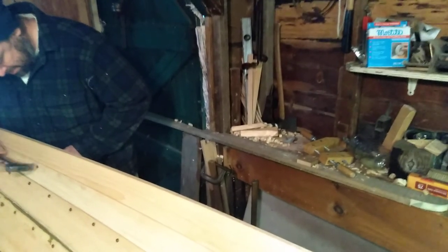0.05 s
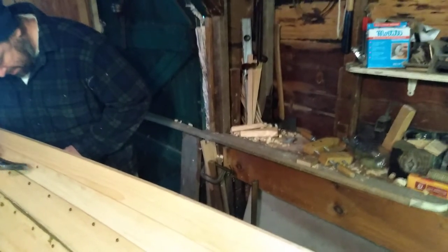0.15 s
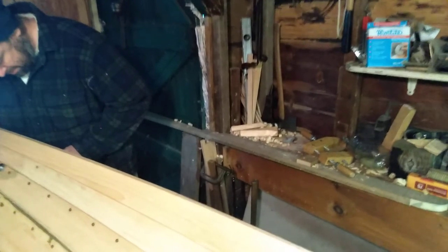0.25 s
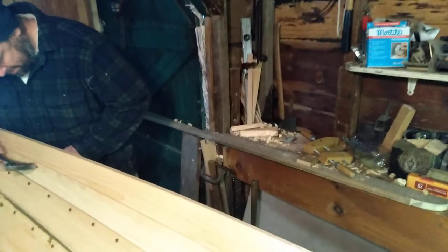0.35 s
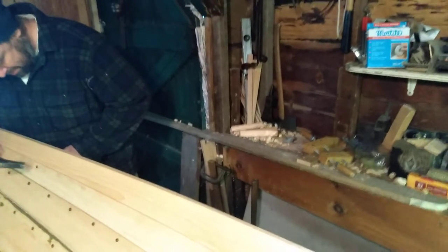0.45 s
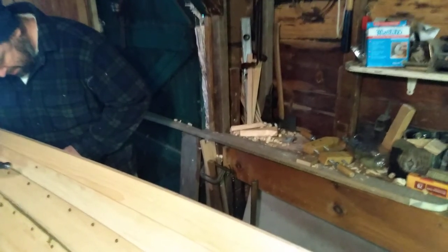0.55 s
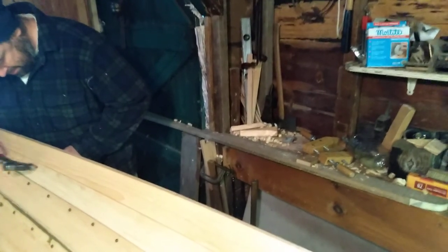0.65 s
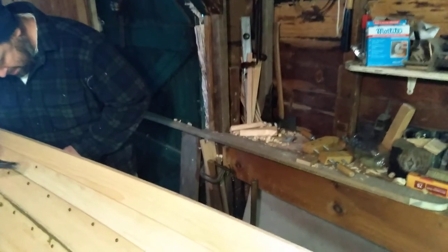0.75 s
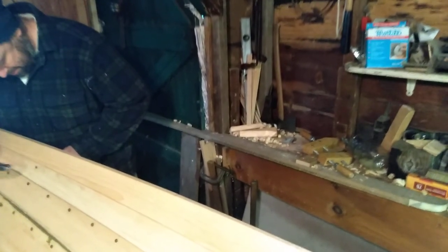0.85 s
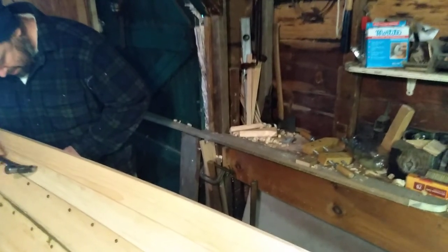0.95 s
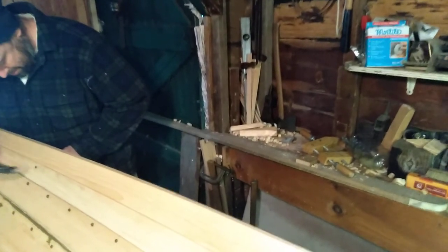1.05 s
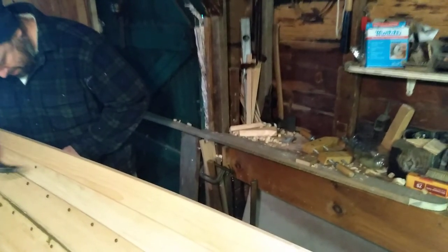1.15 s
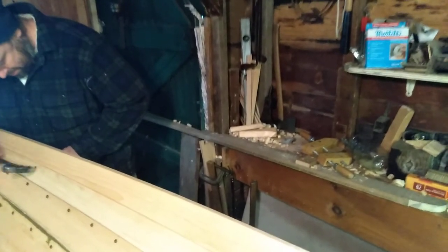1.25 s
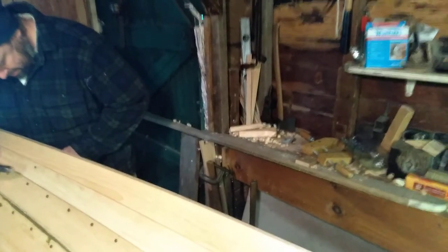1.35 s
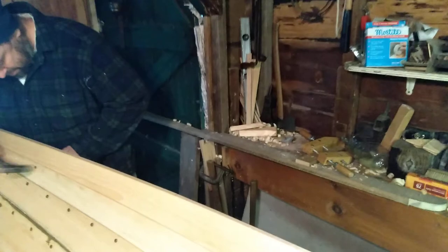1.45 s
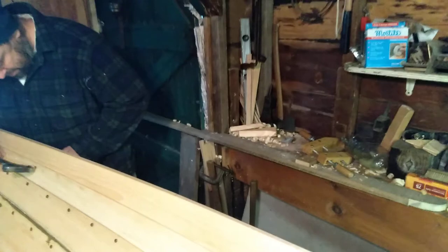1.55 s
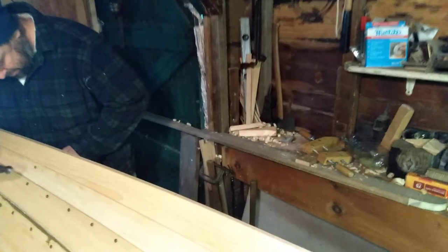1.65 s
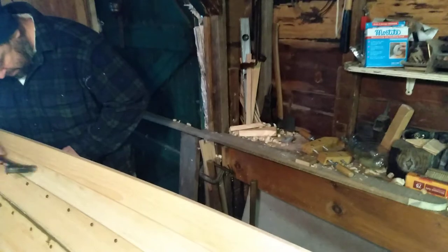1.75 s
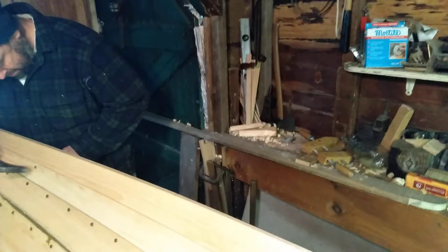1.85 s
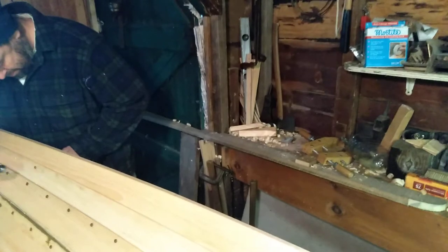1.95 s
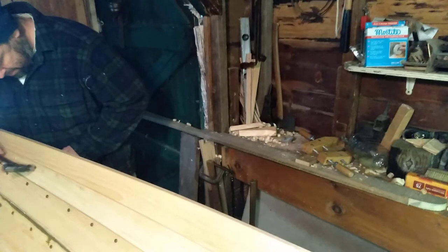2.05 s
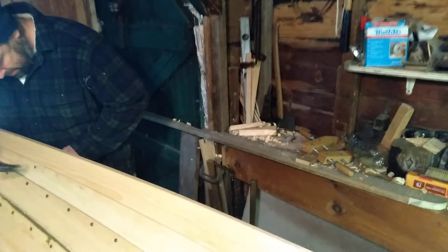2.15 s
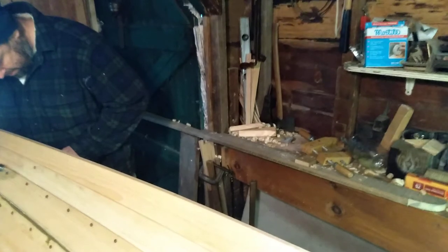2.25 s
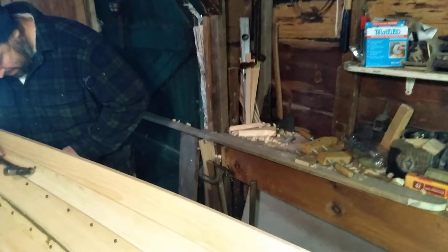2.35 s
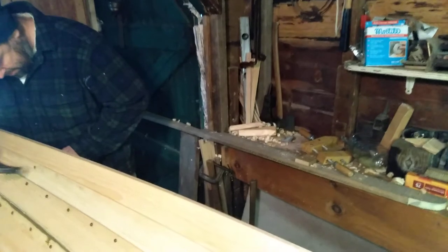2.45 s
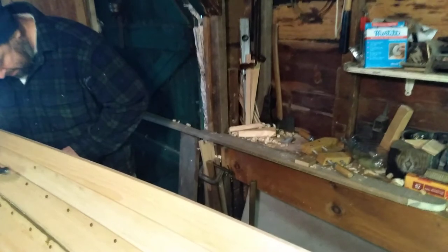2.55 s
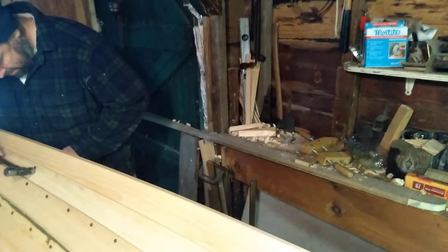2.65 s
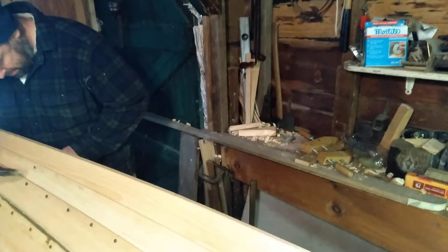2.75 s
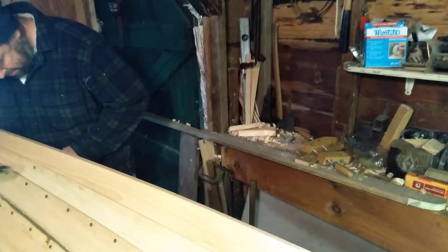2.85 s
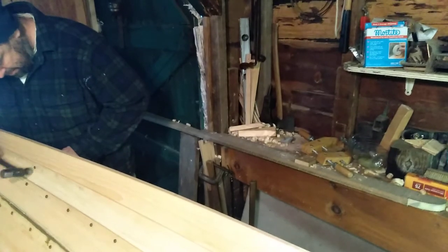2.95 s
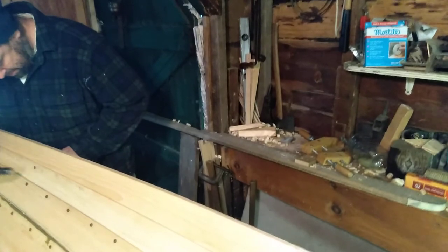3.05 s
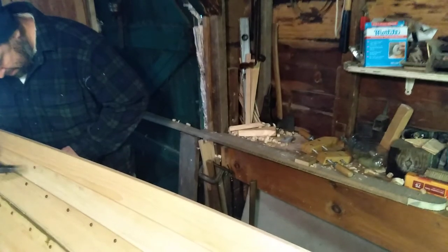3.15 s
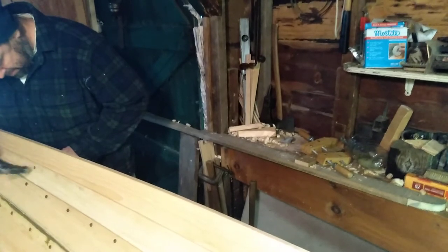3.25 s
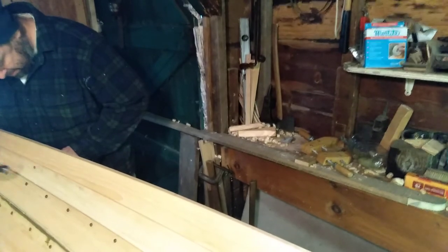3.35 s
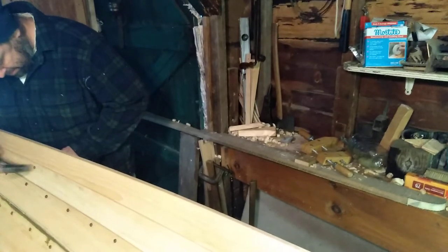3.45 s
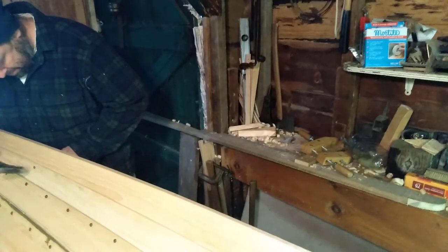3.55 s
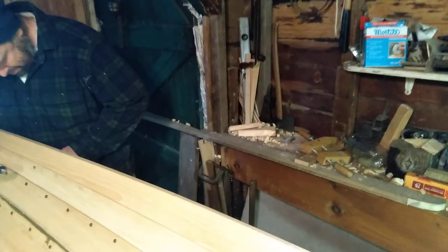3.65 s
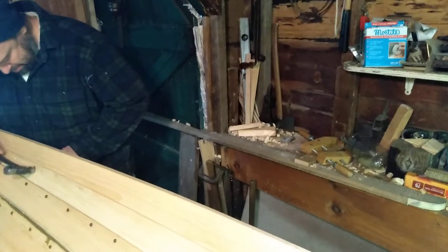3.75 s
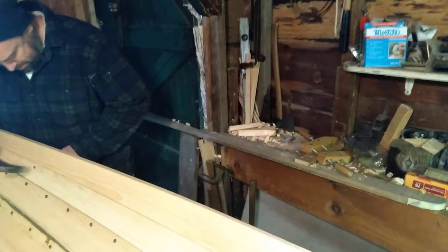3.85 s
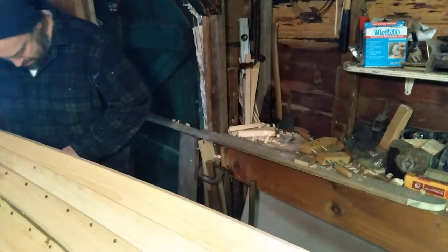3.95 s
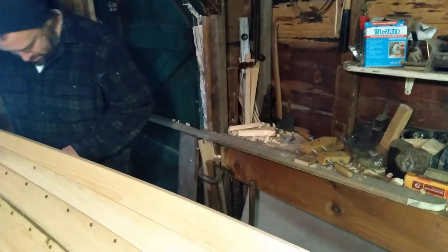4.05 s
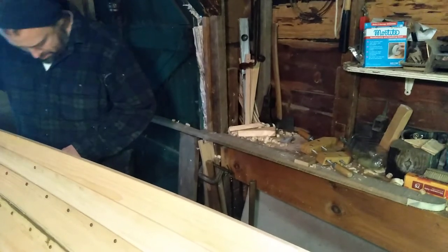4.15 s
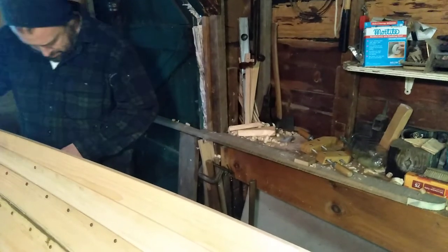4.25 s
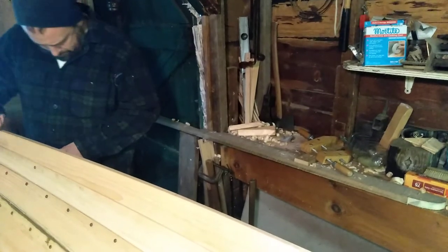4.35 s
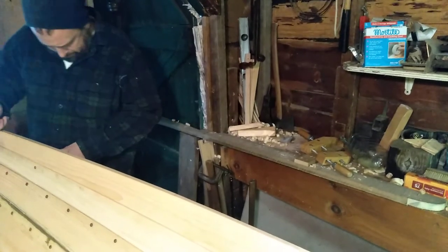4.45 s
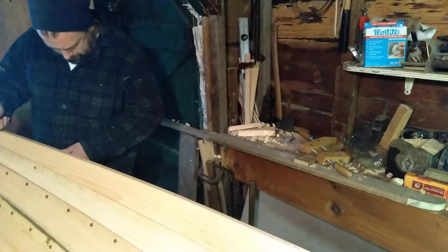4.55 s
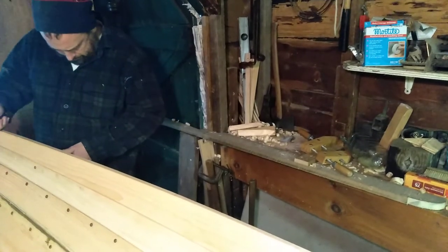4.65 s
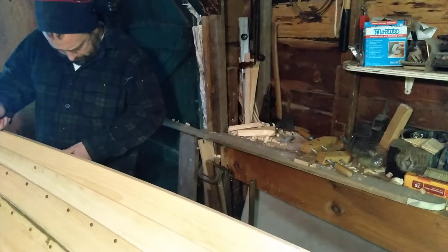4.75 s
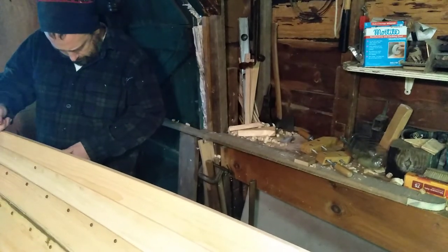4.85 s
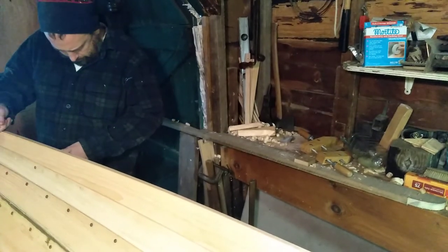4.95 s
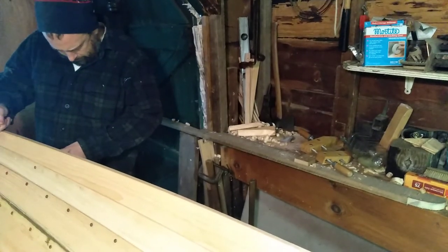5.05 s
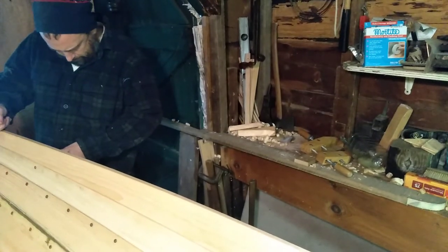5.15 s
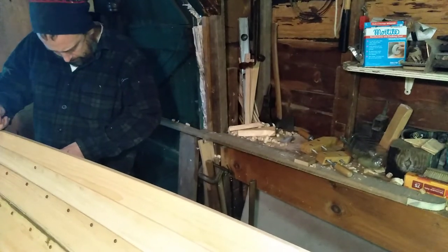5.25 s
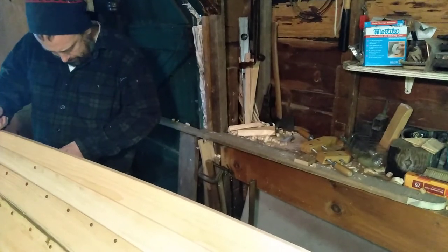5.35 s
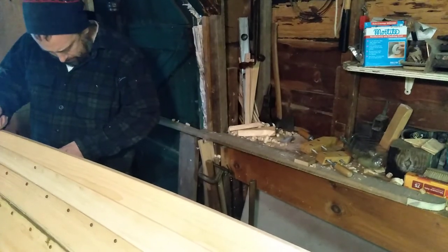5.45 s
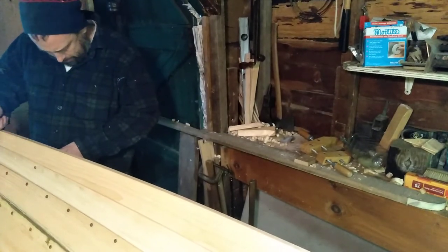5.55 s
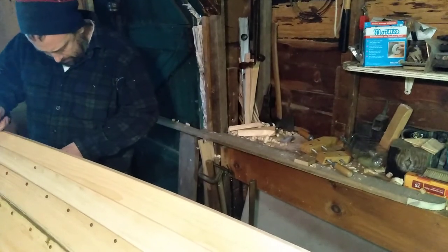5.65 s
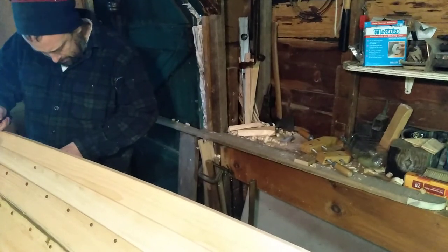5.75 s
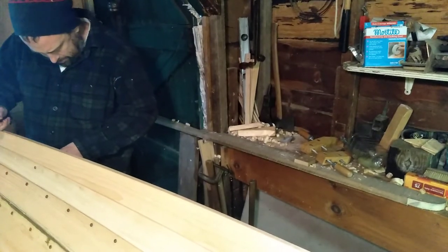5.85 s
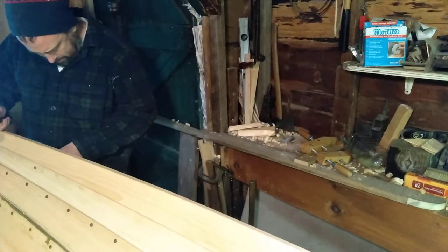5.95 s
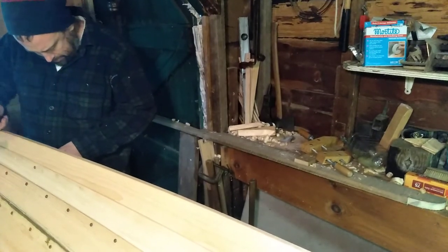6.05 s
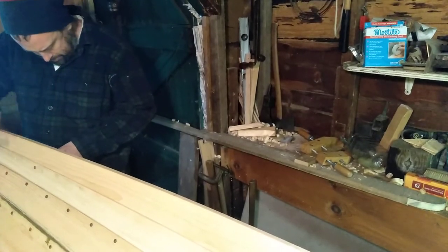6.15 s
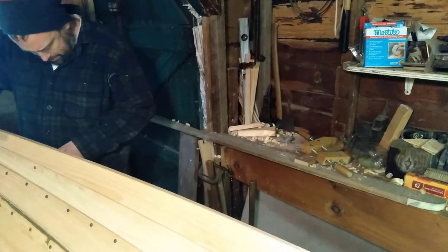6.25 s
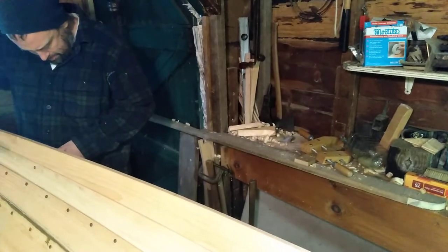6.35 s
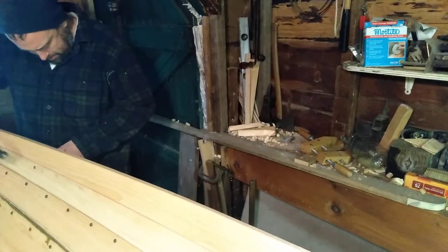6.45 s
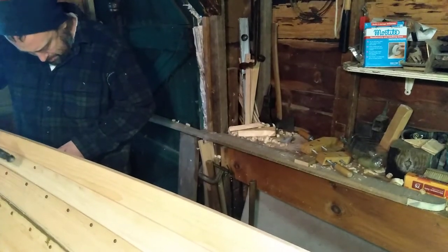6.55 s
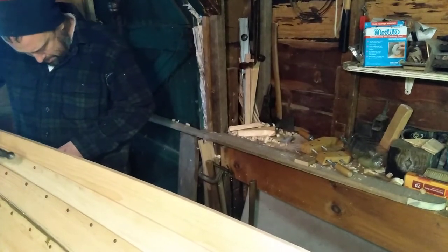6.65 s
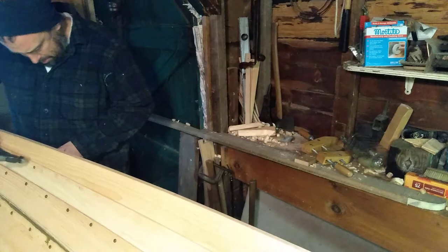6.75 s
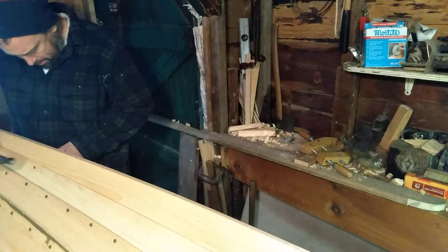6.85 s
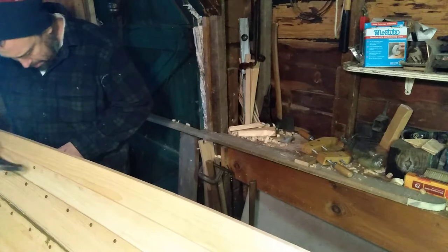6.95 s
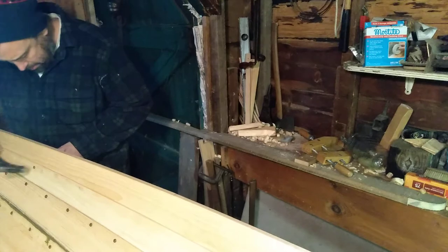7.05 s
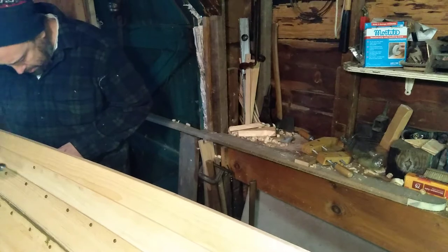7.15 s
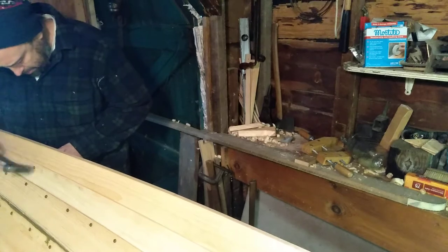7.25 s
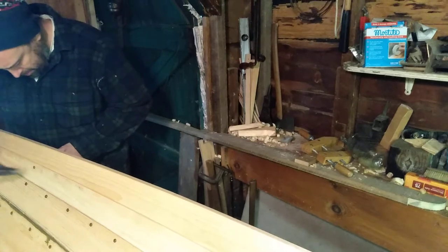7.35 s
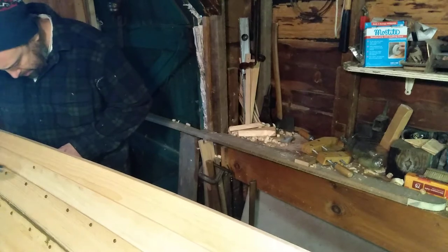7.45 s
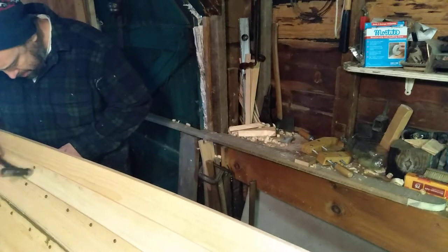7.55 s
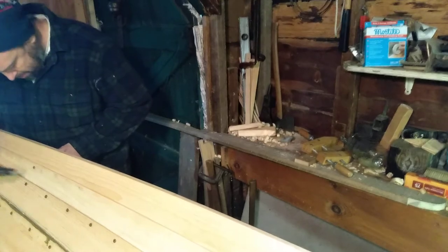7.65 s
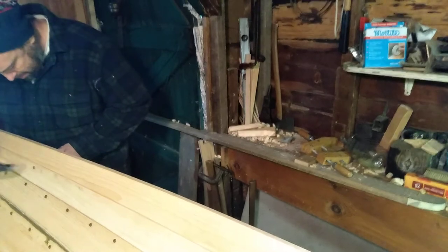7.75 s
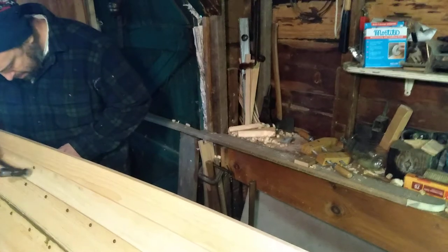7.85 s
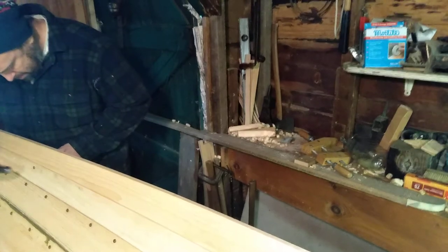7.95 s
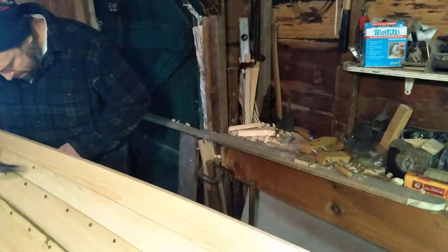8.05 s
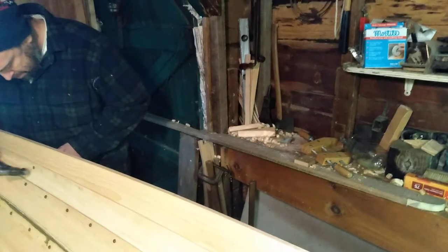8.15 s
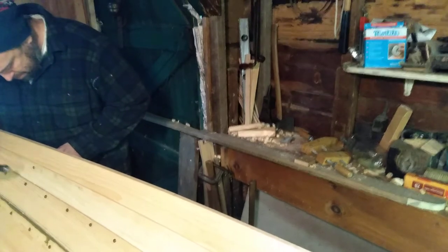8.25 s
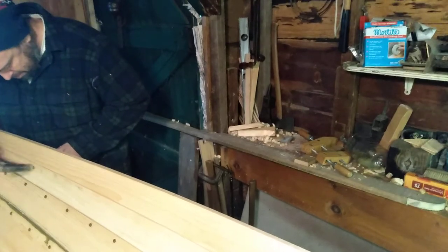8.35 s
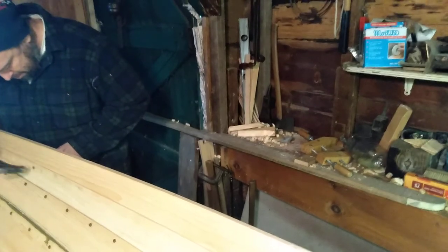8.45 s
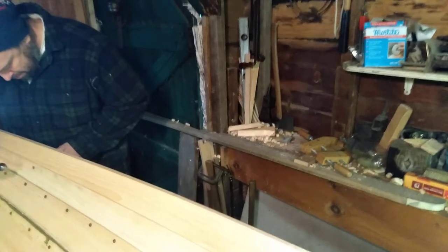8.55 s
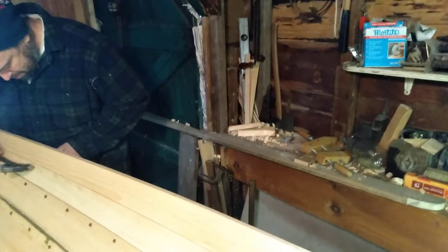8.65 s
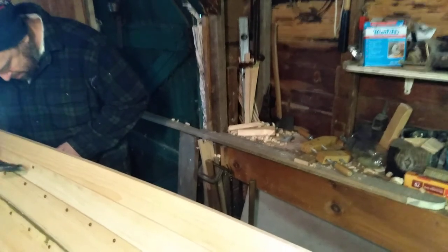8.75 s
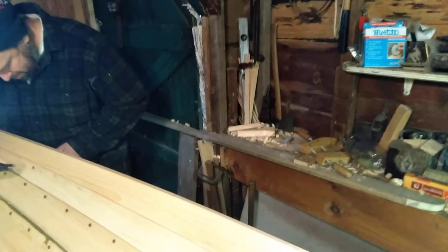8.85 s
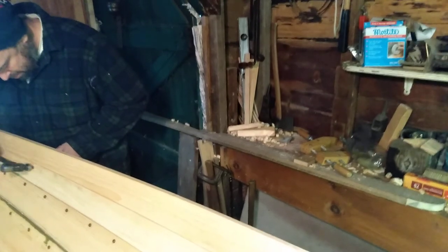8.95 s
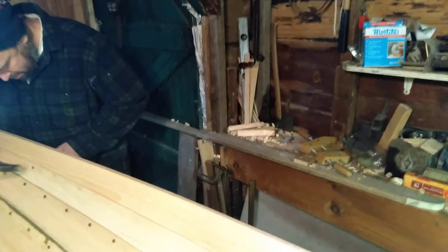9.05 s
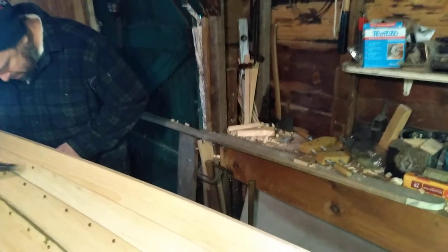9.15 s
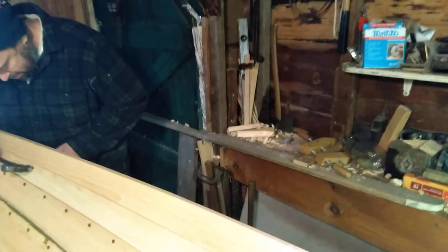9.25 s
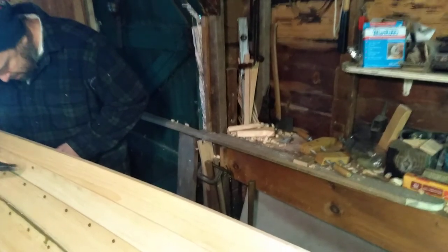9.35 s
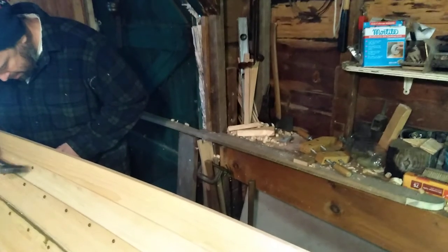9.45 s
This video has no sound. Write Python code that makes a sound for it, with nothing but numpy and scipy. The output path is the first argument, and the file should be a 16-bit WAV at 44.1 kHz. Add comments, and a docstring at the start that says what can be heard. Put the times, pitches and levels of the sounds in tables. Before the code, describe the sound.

Fast, regular hammering on wooden planks, nearly four blows a second, sharp and slightly overloaded at the close microphone, with short woody ringing and a soft backing thud between strikes. Midway comes a quiet gap of over three seconds: light metal ticks, a brief drag, a deep dull knock, cloth movement and a low drone. The same even hammering returns in the small shed, with a faint bright tick near the end.

```python
"""Riveting a wooden hull

A hammer peens a rivet close to a microphone in a small workshop: two even runs of blows, each blow with a
dull after-thud. Soft knocks, a dragged tool and the rustle of cloth fill the pause; small ticks come there
and among the blows. Blows, ticks and knocks excite decaying noise bands and plank modes; thuds, cloth and
tool are shaped noise. Beneath lie hiss, a faint hum and a low drone. The microphone saturates on the blows."""
import sys
import numpy as np
from scipy import signal
from scipy.fft import rfft, irfft, next_fast_len
from scipy.io import wavfile
from scipy.ndimage import map_coordinates

SR = 44100
rng = np.random.default_rng(int(sys.argv[2]) if len(sys.argv) > 2 else 0)


def persist_wave(psi):
    """Save psi, clipped to +-1, as 16-bit WAV."""
    counts = np.round(np.clip(psi, -1, 1) * 32767).astype(np.int16)
    wavfile.write(sys.argv[1], SR, np.atleast_2d(counts).T)


def ratio_of_db(decibels):
    """Turn decibels (scalar or array-like) into linear amplitude factors; 0 dB maps to 1."""
    return 10 ** (np.asarray(decibels, float) / 20)


N = 419391  # samples in the scene
RING_SAMPLES = 1 << 15  # longest ringing of one contact

# Relative spectral densities: f/Hz, level/dB.
HISS_SPECTRUM = [(30, -25), (70, 0), (130, -7), (300, -14), (700, -19), (1400, -22), (2800, -27),
                 (6000, -27), (10000, -27), (13000, -30), (16500, -29)]  # shed and microphone hiss
SCRAPE_SPECTRUM = [(35, -49), (81, 0), (195, -11.5), (302, -3), (418, -14), (835, -12), (1000, -30),
                   (1630, -17), (2100, -28), (2600, -13), (3200, -30), (4300, -28), (5600, -18),
                   (6500, -28), (7300, -23), (15000, -43)]  # tool on plank, with the tool's resonances
CLOTH_SPECTRUM = [(35, -39.5), (60, -3.5), (146, -1), (274, -8), (553, -11.5), (903, -23.5), (1220, -25),
                  (8920, -23.5), (16000, -46.5)]  # rubbing cloth
THUD_SPECTRUM = [(60, -40), (100, 0.5), (200, -1.5), (320, -4), (550, -1.86), (680, -12.5), (900, -21),
                 (2000, -40.5), (4000, -120)]  # backing iron on plank
# Faint hum, its partials: f/Hz, mean rms level/dB.
HUM_PARTIALS = [(77.5, -84), (156.1, -84), (231.5, -83), (306.8, -88)]
# Low drone that swells through the pause: t/s, rms level/dB.
DRONE_SWELL = [(4.8, -92), (5.3, -72), (5.7, -75.5), (6.1, -65), (6.95, -63), (7.3, -94)]
# Likeness of the two microphone ports: f/Hz, correlation.
PORT_LIKENESS = [(60, 1), (180, 0.98), (550, 0.6), (1650, -0.25), (4970, -0.05), (15000, 0.49)]
# Balance of the two microphone ports: f/Hz, left-right level/dB.
PORT_BALANCE = [(300, -0.64), (700, 1.5), (1400, -0.44), (2800, 2.5), (5500, 2), (7500, 5), (9500, -8.5),
                (12500, 2.5), (15000, 1.5)]
# Dense ringing of planks and shed, by band: f/Hz, level/dB, t60/s at ring factor 1, build-up time/s.
RING_BANDS = [(52.3, -32, 1, 0.036), (76, -11, .6, 0.086), (121, -10.5, 0.41, 0.0046),
              (195, -19.5, 0.51, 0.0067), (290, -12, 0.28, 0.011), (393, -14, 0.26, 0.0056),
              (776, -3.5, 0.22, 0.0033), (1560, 0.5, 0.2, 0.003), (1990, -6.5, 0.19, 0.002),
              (2780, -9, 0.17, 0.0033), (3892, -7, 0.17, 0.00037), (6580, -7.5, 0.16, 0.0018),
              (8796, -9.5, .14, 0.00092), (12500, -14.5, 0.073, 0.0019), (16000, -12, .11, .0011)]
# Modes of the planking that stand out: f/Hz, mean relative level/dB, t60/s at ring factor 1 before its cap.
PLANK_MODES = [(108, -8, .7), (160, -16, .4), (311, -13, .35), (455, -16, .3), (545, -16, .2),
               (677, -13, .22), (790, -14, .2), (900, -13, .2), (993, -14, .2), (1099, -14, .2),
               (1180, -14, .2), (1292, -14, .22), (1398, -11, .17), (1432, -11, .17), (1513, -7, .18),
               (1660, -13, .18), (1761, -15, .15), (1945, -13, .18), (2088, -17, .15), (3420, -21, .14),
               (4000, -20, .14), (4146, -18, .16), (5390, -21, .14), (5985, -19, .14), (7540, -23, .13)]
# Likeness of a contact to the one before: f/Hz, correlation.
REPEATABILITY = [(100, .9), (1500, .9), (4000, .6), (10000, .4)]
# Hammer blows, the first still ringing at the start: t/s, strength/dB, boom/dB, body/dB, brightness/dB.
HAMMER_BLOWS = [(-.085, -6.5, 0, -0.5, -1.5), (0.19, -6, 3, 1.93, 3), (0.46, -2.5, 0.8, 4, 3.5),
                (0.745, -1.5, -1, 1.8, -3), (1.021, 0, -3.5, -2.4, -1.2), (1.3, -2.5, 0.3, 0.5, -2),
                (1.586, -9, 3.5, 11, -2.5), (1.873, -2.5, -1.1, 0.3, -2.5), (2.158, -9.5, 3, 4, 4),
                (2.453, -8, -1.9, 6.5, 5), (2.743, -8.5, -0.55, 2, 4), (3.018, -3, -2.5, -1.2, 4.5),
                (3.292, 0, -5, -5, 2.9), (3.574, -4.5, -3, 0.05, 0.2), (7.074, -6.5, -4, -3.5, -2.5),
                (7.342, -7, -1, -2.5, -0.8), (7.621, -5, -2.5, -4.4, 0.15), (7.902, -5, -5, -4, 2.55),
                (8.178, -6.5, 0.1, 3.5, 3.5), (8.455, -6, -1.2, 4, 2), (8.726, -6.5, -1.2, 4, -1.1),
                (9.005, -4, -4, 0.5, -7), (9.275, -6.5, -0.1, 4.15, -10)]
# Light ticks of metal on the planks: t/s, strength/dB, ring-time factor.
METAL_TICKS = [(1.54, -62, .5), (3.909, -72, .56), (4.025, -70, 0.54), (4.128, -67.5, 0.55),
               (7.51, -68, 1.8), (9.394, -54.5, 1.1)]
# Dull knocks against the hull: t/s, strength/dB, boom/dB, body/dB, ring-time factor.
DULL_KNOCKS = [(3.94, -68, 4, 12, .8), (5.124, -51.5, 24.5, 21.5, 1.2), (5.439, -84, 16, 29, .87),
               (5.895, -62, 18, -3, 0.53), (5.967, -62.5, 13, 3, .46), (6.005, -60.5, 11, 4, 0.42)]
# Overall gain, higher in the second run after a brief dip as it begins: t/s, level/dB.
OVERALL_GAIN = [(3.9, -3), (6.9, 4.6), (7.02, -10), (7.12, -2.5), (7.3, -0.55)]


def unit(x):
    """Normalisation: a signal divided by its root mean square has rms 1."""
    return x / np.sqrt(np.mean(x ** 2) + 1e-20)


def along(points, hz):
    """Interpolation on a logarithmic frequency axis of (f/Hz, value) points."""
    f, v = np.transpose(points)
    return np.interp(np.log(hz + 1), np.log(f + 1), v)


def curve(rows):
    """Linear interpolation in time of (t/s, value) points, one value per sample."""
    return np.interp(np.arange(N) / SR, *np.transpose(rows))


def wobble(rate):
    """Band-limited fluctuation: a smooth curve through random knots, rate of them per second."""
    knots = rng.standard_normal(int(N * rate / SR) + 4)
    return map_coordinates(knots, [np.arange(N) * rate / SR])


def two_ports(pair, hz):
    """Partial coherence: two unrelated spectra mix to the likeness and balance of the microphone ports."""
    turn = np.arccos(np.clip(along(PORT_LIKENESS, hz), -1, 1)) / 2
    mid, side = pair[0] * np.cos(turn), pair[1] * np.sin(turn)
    lean = ratio_of_db(along(PORT_BALANCE, hz) / 2)
    return np.array([(mid + side) * lean, (mid - side) / lean])


def noise(spectrum):
    """Filtered random noise: white spectra weighted by a spectral density give stereo noise of rms 1."""
    m = next_fast_len(N)
    hz = np.fft.rfftfreq(m, 1 / SR)
    white = rfft(rng.standard_normal((2, m)))
    shaped = two_ports(white, hz) * ratio_of_db(along(spectrum, hz))
    return unit(irfft(shaped, m)[:, :N])


def hiss():
    """Stationary noise: shed and microphone hiss at a constant level."""
    return ratio_of_db(-77.5) * noise(HISS_SPECTRUM)


def hum():
    """Superposition of tones: a few sinusoids, each wavering slightly in level, alike at both ports."""
    t = np.arange(N) / SR
    total = np.zeros(N)
    for hz, db in HUM_PARTIALS:
        level = ratio_of_db(db + 1.5 * wobble(6.9)) * np.sqrt(2)  # rms to peak
        total += level * np.sin(2 * np.pi * hz * t)
    return total


def drone():
    """Narrow-band noise: energy gathered around 74 Hz swells and fades."""
    narrow = [(50, -42), (67, -10), (74, 5), (81, -10), (115, -40), (300, -120)]  # f/Hz, level/dB
    return ratio_of_db(curve(DRONE_SWELL)) * noise(narrow)


def drag():
    """Sliding friction: a tool drawn along the plank excites its resonances in one short, even scrape."""
    start_s, length_s, attack_s = 4.02, .19, .02
    level_db, release_db_per_s = -58.5, 300
    since = np.arange(N) / SR - start_s
    attack = np.clip(since / attack_s, 0, 1)
    release = ratio_of_db(-release_db_per_s * np.clip(since - length_s, 0, None))
    return ratio_of_db(level_db + 1.9 * wobble(40)) * attack * release * noise(SCRAPE_SPECTRUM)


def rustle():
    """Irregular friction: cloth and moving hands rub in uneven puffs within one swell."""
    level_db, edge_db = -58, -20
    swell = [(0, -120), (5.76, edge_db), (5.96, 0), (6.12, 0), (6.26, edge_db), (7.26, -120)]  # t/s, level/dB
    puffs = 2.4 * wobble(16) + 1.5 * wobble(60) + 1.6 * wobble(240)
    return ratio_of_db(level_db + curve(swell) + puffs) * noise(CLOTH_SPECTRUM)


def after_thud():
    """Secondary impact: about a fifth of a second after a blow the backing iron settles softly on the plank."""
    delay_s, swell_s = .195, 0.042
    level_db, scatter_db = -42.5, 2.5
    start = np.transpose(HAMMER_BLOWS)[0][:, None] + delay_s
    db = level_db + scatter_db * rng.standard_normal(start.shape)
    swell = np.clip((np.arange(N) / SR - start) / swell_s, 0, None)
    thuds = ratio_of_db(db) * swell * np.exp(1 - swell)  # each peaks swell_s after its start
    return thuds.sum(axis=0) * noise(THUD_SPECTRUM)


def band_filters(hz):
    """Spectral partition: overlapping triangular bands on a logarithmic axis, each of rms 1."""
    centres = np.array(RING_BANDS)[:, 0]
    index = np.arange(len(centres))
    place = np.interp(np.log(hz + 1), np.log(centres + 1), index)
    bands = np.clip(1 - abs(place - index[:, None]), 0, 1)
    return bands / np.sqrt(np.mean(bands ** 2, axis=1, keepdims=True))


def dense_ringing(pattern, bands, hz, t, colour, ring):
    """Diffuse reverberation: overlapping modes of planks and shed act as noise, decaying band by band."""
    band_hz, band_db, band_t60, build_s = np.transpose(RING_BANDS)[..., None]
    hold_s = 0.024
    late = np.sqrt(t ** 2 + hold_s ** 2) - hold_s  # early echoes delay the decay
    fall_db = -60 * late / (band_t60 * ring)
    far_corners = ratio_of_db(-37.5 + 0.35 * fall_db)  # answer longer and weaker
    fading = ratio_of_db(fall_db) + far_corners
    build_up = 1 - np.exp(-t / build_s)
    crack = 0.66 * np.exp(-t / 0.0073) * (band_hz > 2000)  # the first instants have extra treble
    dense = irfft(two_ports(pattern, hz)[:, None] * bands, RING_SAMPLES)
    dense *= ratio_of_db(band_db + along(colour, band_hz)) * fading * build_up * (1 + crack)
    return dense.sum(axis=1)


def plank_ringing(phase, t, colour, ring):
    """Modal vibration: outstanding plank modes sound as decaying sinusoids that beat with close neighbours."""
    level_db, scatter_db = -1.5, 4.3
    mode_hz, mode_db, mode_t60 = np.transpose(PLANK_MODES)[..., None]
    table = np.array(RING_BANDS)
    mode_t60 = np.minimum(mode_t60, 1.12 * along(table[:, [0, 2]], mode_hz))  # none outlasts the wood by much
    hold_s = 0.024
    late = np.sqrt(t ** 2 + hold_s ** 2) - hold_s
    scatter = scatter_db * rng.standard_normal(mode_hz.shape)
    level = level_db + mode_db + along(colour, mode_hz) + scatter
    fading = ratio_of_db(level - 60 * late / (mode_t60 * ring))
    build_up = 1 - np.exp(-t / along(table[:, [0, 3]], mode_hz))
    beat_hz = rng.uniform(8, 30, mode_hz.shape)
    beat = 1 + .6 * np.cos(2 * np.pi * (beat_hz * t + rng.random(mode_hz.shape)))
    modes = beat * fading * build_up * np.sin(2 * np.pi * mode_hz * t + phase)
    return modes.sum(axis=1)


def mode_phases():
    """Interport phase: each mode lags between the ports by the angle whose cosine is their likeness."""
    mode_hz = np.transpose(PLANK_MODES)[0][:, None]
    phase = rng.uniform(0, 2 * np.pi, (2, len(PLANK_MODES), 1))
    lag = np.arccos(np.clip(along(PORT_LIKENESS, mode_hz), -1, 1))
    phase[1] = phase[0] + lag * np.sign(phase[1] - np.pi)
    return phase


def hull(events):
    """Impulse response: each contact rings the hull; striking one spot makes it resemble the one before."""
    out = np.zeros((2, N + 2 * RING_SAMPLES))
    t, hz = np.arange(RING_SAMPLES) / SR, np.fft.rfftfreq(RING_SAMPLES, 1 / SR)
    bands, phase = band_filters(hz), mode_phases()
    echo = 1 + 0.44 * np.exp(-((t - .037) / 0.018) ** 2)  # a wall about six metres off answers once
    keep = along(REPEATABILITY, hz)
    pattern = rfft(rng.standard_normal((2, RING_SAMPLES)))
    for s, db, boom_db, body_db, bright_db, ring in events:
        fresh = rfft(rng.standard_normal((2, RING_SAMPLES)))
        pattern = keep * pattern + np.sqrt(1 - keep ** 2) * fresh
        colour = [(130, boom_db), (400, body_db), (1400, 0), (7000, bright_db)]  # f/Hz, level/dB
        ringing = dense_ringing(pattern, bands, hz, t, colour, ring) + plank_ringing(phase, t, colour, ring)
        start = RING_SAMPLES + round(s * SR)
        out[:, start:start + RING_SAMPLES] += ratio_of_db(db) * echo * ringing
    return out[:, RING_SAMPLES:RING_SAMPLES + N]


def ticks_and_knocks():
    """Light impacts: metal ticks excite the planks brightly, knocks against the hull dully."""
    boom_db, body_db, bright_db = -3, 3.5, 10.5  # colour of every tick
    ticks = [(s, db, boom_db, body_db, bright_db, ring) for s, db, ring in METAL_TICKS]
    knocks = [(s, db, boom, body, -4, ring) for s, db, boom, body, ring in DULL_KNOCKS]
    return hull(ticks + knocks)


def hammer_blows():
    """Impact excitation: hammer blows ring the hull, the ring time set from the strength of each blow."""
    ring_at_0_db, ring_per_db = 0.9462, -0.0104  # ring-time factor
    return hull([(*blow, ring_at_0_db + ring_per_db * blow[1]) for blow in HAMMER_BLOWS])


def scene():
    """Linear superposition: the pressures of all sources add at the microphone."""
    background = hiss() + hum() + drone()
    handling = drag() + rustle() + ticks_and_knocks()
    return background + handling + after_thud() + hammer_blows()


def band_limit(x):
    """A steep low-pass at the top of the band."""
    return signal.sosfilt(signal.butter(12, 16590, fs=SR, output="sos"), x)


def record(dry):
    """Saturation and band limiting: the microphone squeezes peaks and loses deep bass and top treble."""
    top, hardness = 1.05, 3
    squeezed = dry / (1 + abs(dry / top) ** hardness) ** (1 / hardness)
    microphone = signal.butter(2, [70, 11500], "bandpass", fs=SR, output="sos")
    top_limit = signal.cheby2(8, 30, 16200, fs=SR, output="sos")
    coloured = signal.sosfilt(top_limit, signal.sosfilt(microphone, squeezed))
    mix = np.clip(coloured * ratio_of_db(curve(OVERALL_GAIN)), -1, 1)  # the converter clips at full scale
    return band_limit(mix)


dry = scene()
out = record(dry)
persist_wave(out)
```